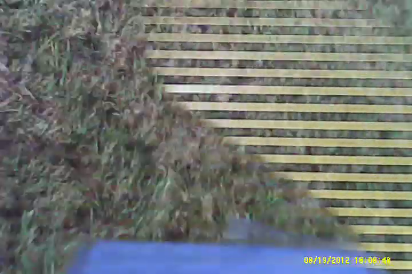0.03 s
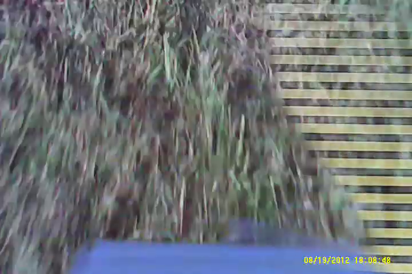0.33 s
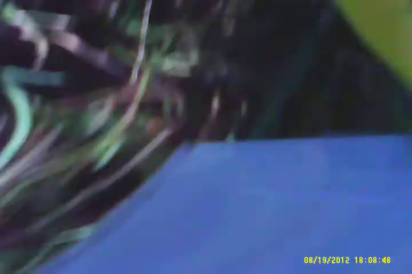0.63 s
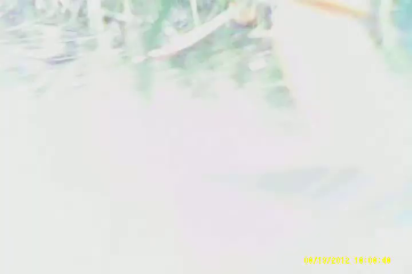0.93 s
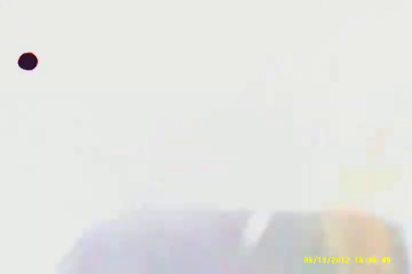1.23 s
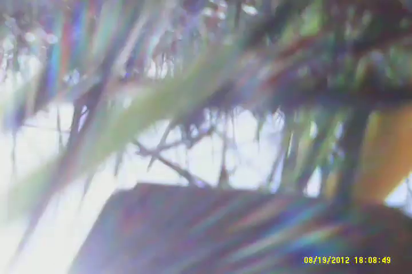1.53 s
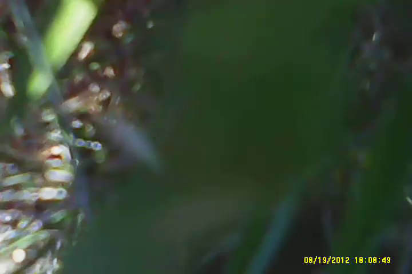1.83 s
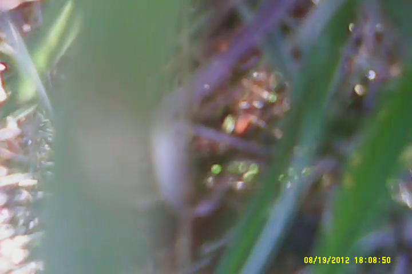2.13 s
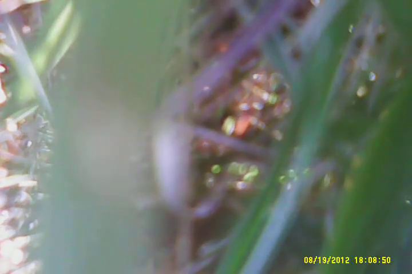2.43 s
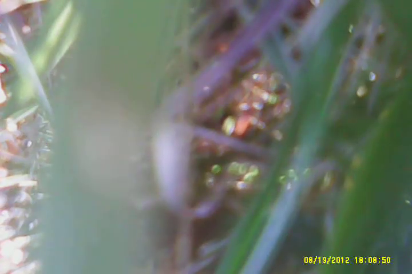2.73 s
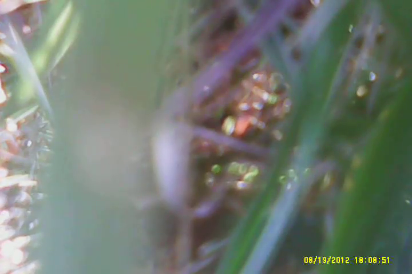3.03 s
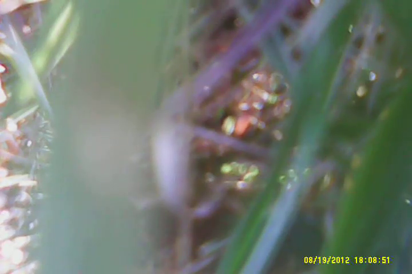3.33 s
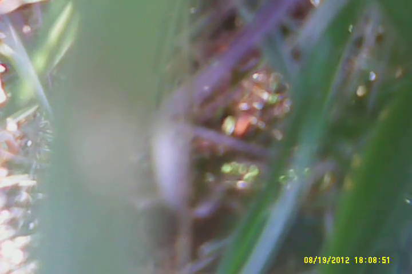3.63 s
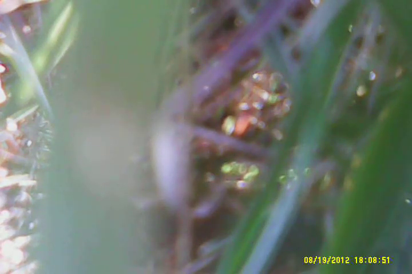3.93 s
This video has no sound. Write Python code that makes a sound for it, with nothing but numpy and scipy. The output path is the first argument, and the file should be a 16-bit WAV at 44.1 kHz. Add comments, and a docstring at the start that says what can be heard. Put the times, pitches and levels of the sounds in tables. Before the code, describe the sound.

A model plane crashes into reeds, heard from an overloaded microphone on board. Loud propeller buzz and wind cut off into harsh crackling, scraping, bumps and snaps, which thin to sparse ticks above soft hiss and electrical pulsing.

```python
"""A model plane flies low, its propeller and the wind overloading the microphone of its tiny camera.
It ploughs into tall reeds: the motor stops, leaves crackle, stems scrape, the airframe bumps, stalks snap.
Then it lies still and a few stalks tick as they settle.
The camera's hiss and soft electrical pulsing run underneath."""
import sys
import numpy as np
from scipy import signal
from scipy.fft import rfft, irfft, next_fast_len
from scipy.io import wavfile
from scipy.ndimage import uniform_filter1d

SR = 44100
rng = np.random.default_rng(int(sys.argv[2]) if len(sys.argv) > 2 else 0)


def bounce(signal):
    """Save signal as a 16-bit WAV file at the path given by the first command-line argument."""
    frames = np.transpose(np.atleast_2d(signal))
    limited = np.clip(frames, -1, 1)
    pcm = np.round(limited * 32767).astype(np.int16)
    wavfile.write(sys.argv[1], SR, pcm)


N = 176400
TIME_S = np.arange(N) / SR


def from_db(db):
    """Decibels to gain."""
    return 10 ** (np.asarray(db) / 20)


def unit_rms(x):
    """Scale to unit rms."""
    return x / np.sqrt(np.mean(x ** 2) + 1e-20)


def gain_curve(rows):
    """Gain along a level curve, silent outside it."""
    return from_db(np.interp(TIME_S, *np.transpose(rows), left=-150, right=-150))


def butter(x, hz, kind, order=2):
    """Butterworth filter."""
    return signal.sosfilt(signal.butter(order, hz, kind, fs=SR, output="sos"), x)


def cut_above(x, hz, taps):
    """Steep FIR low-pass."""
    return signal.fftconvolve(x, signal.firwin(taps, hz, fs=SR, window="blackman")[None], "same")


def drift(rate_hz):
    """Straight lines between unit-variance random knots."""
    knots = rng.standard_normal(4000)
    return np.interp(TIME_S * rate_hz, np.arange(len(knots)), knots)


def coloured(x, spectrum, centre_hz=None, half_width_oct=0.81):
    """Minimum-phase filter with the given spectrum, optionally peaked at a centre."""
    size = next_fast_len(2 * len(x)) // 2 * 2
    octave = np.log2(np.maximum(np.arange(size // 2 + 1) * SR / size, 1))
    hz, db = np.transpose(spectrum)
    log_gain = np.log(from_db(np.interp(octave, np.log2(hz), db)))
    if centre_hz:
        log_gain -= np.log(1 + ((octave - np.log2(centre_hz)) / half_width_oct) ** 2)
    cepstrum = irfft(log_gain)[:size // 2]
    cepstrum[0] /= 2
    response = np.exp(2 * rfft(cepstrum, size))
    return irfft(rfft(x, size) * response)[:len(x)]


def add(out, start_s, sound):
    """Mix a sound in at a time."""
    start = int(start_s * SR)
    out[start:start + len(sound)] += sound[:max(N - start, 0)]


def fractures(rate_hz=1800, spread_db=3, clump_db=4, clump_hz=110):
    """Tiny fractures of uneven size, in clumps, at an even slow level."""
    sizes_db = spread_db * np.minimum(rng.exponential(1, N), 4) + clump_db * drift(clump_hz)
    clicks = from_db(sizes_db) * rng.choice([-1, 1], N) * (rng.random(N) < rate_hz / SR)
    return clicks / np.sqrt(uniform_filter1d(clicks ** 2, size=1500) + 1e-6)


def burst(level_db, decay_s, spectrum, centre_hz=None, rise_s=.0001, crack_ratio=0, samples=4096):
    """A dying run of fractures, led by a crack of crack_ratio times the run's strength."""
    t = TIME_S[:samples]
    envelope = np.exp(-t / decay_s) * (1 - np.exp(-t / rise_s))
    cracks = envelope * rng.choice([-1, 1], samples) * from_db(3 * rng.standard_normal(samples))
    cracks[0] = crack_ratio * np.sqrt(np.sum(cracks ** 2))
    rms = from_db(level_db) * np.sqrt(np.mean(envelope ** 2))
    return rms * unit_rms(coloured(cracks, spectrum, centre_hz))


# freq_hz, density_db
HISS_SPECTRUM = [(30, 3), (150, -11), (400, -12), (800, -20.5), (2000, -23.5), (4600, -27.5), (6000, -28.5)]

def camera_hiss(level_db=-49):
    """Steady noise floor of the camera."""
    return from_db(level_db) * unit_rms(coloured(rng.standard_normal(N), HISS_SPECTRUM))


# start_s, depth_db
CURRENT_SURGES = [(1.93, -28), (2.125, -32), (2.271, -28), (2.416, -29.5), (2.608, -29.5), (2.752, -28),
                  (2.945, -30.5), (3.089, -30), (3.288, -29), (3.429, -30.5), (3.574, -30), (3.767, -29),
                  (3.911, -30.5)]

def camera_pulsing(period_s=.0483, align_s=2.74, pulse_s=.0099, pulse_db=-37, surge_s=.013, top_hz=330):
    """Bursts of current pull the signal down: regular pulses and rougher, deeper surges."""
    dips = from_db(pulse_db) * ((TIME_S - align_s) % period_s < pulse_s)
    roughness = 1 + 0.14 * unit_rms(butter(rng.standard_normal(N), top_hz, "low"))
    for start_s, depth_db in CURRENT_SURGES:
        dips += from_db(depth_db) * roughness * ((TIME_S > start_s) & (TIME_S < start_s + surge_s))
    rounded = butter(-dips, top_hz, "low", order=1)
    return butter(rounded, hz=14, kind="high", order=1)   # AC coupling


# freq_hz, density_db
REED_SPECTRUM = [(100, -15), (600, -9), (1200, -16.5), (1600, -8.5), (1900, -1.5), (2500, -2.5), (2850, -6),
                 (3150, -11), (3600, -4), (4100, -7.5), (4500, -5), (5000, -12.5), (5600, -14)]
# start_s, level_db, decay_s, centre_hz
STALK_SNAPS = [(.74, -2, 0.012, 2400), (0.787, -3.5, 0.0022, 3000), (0.94, -4, 0.0032, 2090),
               (.966, -4, 0.011, 2270), (1.086, -9, 0.0029, 2380), (1.255, -2.5, 0.008, 2320),
               (1.298, 3, 0.0025, 2870), (1.338, -8.5, .004, 2570), (1.346, -7, 0.0024, 2400),
               (1.409, -4, 0.0015, 2050), (1.438, -3.5, 0.0032, 2360), (1.462, -4.5, 0.0027, 2090),
               (1.493, -7, 0.0019, 2400), (1.508, -10, .003, 2260), (1.571, -16, 0.0077, 2410),
               (1.609, 2, 0.001, 3430), (1.626, -6, 0.0057, 2640), (1.662, -2.5, 0.0014, 2520),
               (1.678, -25, .002, 2500), (1.73, -8, 0.005, 2030), (1.763, -16, 0.0057, 4200),
               (1.774, -6, 0.0047, 4600), (1.781, -4, 0.0036, 2970), (1.823, -18.5, 0.0045, 4000),
               (1.865, -17, .004, 3000), (1.887, -18, 0.0024, 2500), (1.912, -21.5, 0.0062, 3500),
               (2.009, -29, 0.0045, 3000), (2.015, -2, 0.00095, 2500), (2.071, -22.5, 0.0023, 3000),
               (2.136, -21.5, 0.0053, 3070), (2.187, -33, .004, 4030), (2.199, -24, 0.0019, 2800),
               (2.211, -28.5, 0.0026, 2330), (2.251, -24, 0.002, 2490), (2.263, -29, 0.0015, 4000),
               (2.293, -29.5, 0.0031, 3300), (2.3694, -20.5, 0.01, 2600), (2.379, -19, 0.0041, 3500),
               (2.397, -30, 0.0039, 3000), (2.416, -41, .003, 3700), (2.46, -41.5, 0.0049, 2600),
               (2.615, -44.5, .004, 1900), (2.643, -41.5, 0.0042, 1900), (2.74, -44, .003, 4000),
               (2.7895, -36, 0.0012, 4120), (2.819, -46, .003, 2600), (2.897, -47, .002, 4300),
               (3.173, -29.5, 0.0014, 3390), (3.453, -39.5, .003, 2400), (3.4789, -20, 0.0011, 2400),
               (3.4963, -25.5, 0.0022, 4030), (3.681, -35, 0.0019, 2100), (3.987, -45.5, 0.0033, 2000)]

def stalk_snaps():
    """Stalks snap under the plane, then tick as they settle."""
    out = np.zeros(N)
    for start_s, level_db, decay_s, centre_hz in STALK_SNAPS:
        add(out, start_s, burst(level_db, decay_s, REED_SPECTRUM, centre_hz, crack_ratio=0.58))
    return out


# time_s, level_db
CRACKLE_LEVELS = [(.59, 14), (.612, 23.5), (.648, 5), (.675, -5), (.715, -2.5), (.76, -11.5), (.815, -16),
                  (.85, -4.5), (.895, 0.5), (.93, -7), (.96, -12), (1.01, -13.5), (1.055, -21.5),
                  (1.087, -14), (1.12, -35.5), (1.16, -35), (1.2, 5), (1.245, -12.5), (1.295, -11.5),
                  (1.34, -19), (1.37, -32), (1.42, -18.5), (1.46, -14), (1.535, -23), (1.61, -15.5),
                  (1.7, -17.5), (1.79, -20.5), (1.85, -29.5), (1.92, -29.5), (1.995, -43.5), (2.03, -29),
                  (2.07, -31), (2.1, -46), (2.22, -47.5), (2.32, -67)]

def leaf_crackle():
    """Leaves and stalks crackle along the airframe."""
    return gain_curve(CRACKLE_LEVELS) * unit_rms(coloured(fractures(), REED_SPECTRUM))


# freq_hz, density_db
AIRFRAME_SPECTRUM = [(40, -13), (150, -2), (350, 0.5), (650, -0.5), (1000, -3.5), (1400, -1.5), (2000, 2),
                     (3200, -11.5), (5000, -38)]
# time_s, level_db
SCRAPE_LEVELS = [(.59, 9), (.61, 17.5), (.66, -8), (.7, -9), (.78, -14), (.825, -12), (.86, -5),
                 (.92, -12.5), (1.03, -22.5), (1.055, -16), (1.09, -23), (1.14, -24.5), (1.16, -17.5),
                 (1.2, -3.5), (1.25, -13.5), (1.3, -13.5), (1.38, -29), (1.47, -36), (1.54, -25.5),
                 (1.7, -41.5), (1.88, -29), (2, -51.5), (2.06, -32.5), (2.2, -73)]

def airframe_scrape():
    """The airframe scrapes through the stems."""
    return gain_curve(SCRAPE_LEVELS) * unit_rms(coloured(fractures(), AIRFRAME_SPECTRUM))


# freq_hz, density_db
BUMP_SPECTRUM = [(25, -1.5), (70, 1), (160, -4.5), (300, -9), (800, -26.5), (3000, -50)]
# start_s, level_db, decay_s
DULL_BUMPS = [(0.609, -1, 0.048), (.68, -4, 0.037), (0.844, 1, 0.02), (1.181, 2.5, .025), (1.285, -17, .04),
              (1.332, -11.5, 0.014)]
# start_s, level_db, decay_s, centre_hz
HARD_KNOCKS = [(1.153, -4.5, 0.003, 1190), (1.168, -13.5, 0.01, 1090), (1.474, -12.5, 0.002, 700),
               (1.572, -13.5, 0.0025, 650), (1.822, -4, .0035, 592), (2.132, -31, 0.0082, 496),
               (2.3683, -23.5, 0.011, 710)]

def airframe_impacts():
    """The airframe shudders with dull bumps and takes short hard knocks."""
    out = np.zeros(N)
    for start_s, level_db, decay_s in DULL_BUMPS:
        add(out, start_s, burst(level_db, decay_s, BUMP_SPECTRUM, rise_s=.0051, samples=16384))
    for start_s, level_db, decay_s, centre_hz in HARD_KNOCKS:
        add(out, start_s, burst(level_db, decay_s, AIRFRAME_SPECTRUM, centre_hz, crack_ratio=1.2))
    return out


# freq_hz, density_db
WIND_SPECTRUM = [(30, -16.5), (90, -6), (200, 0), (500, -3), (1000, -6), (2000, -10.5), (3200, -17),
                 (5000, -25)]

def wind(level_db=14, gust_db=1.5):
    """Airflow buffets the microphone."""
    rush = unit_rms(coloured(rng.standard_normal(N), WIND_SPECTRUM))
    return rush * from_db(level_db + gust_db * drift(rate_hz=60))


# harmonic, relative_db
PROPELLER_HARMONICS = [(1, 0), (2, -2.5), (3, -5), (4, -4.5), (5, -9), (6, -17), (7, -22), (8, -14)]

def propeller(pitch_hz=238.6, wobble=.002, level_db=14, flicker_db=0.74):
    """Propeller buzz: harmonics of a slightly wavering pitch."""
    phase = 2 * np.pi * np.cumsum(pitch_hz * (1 + wobble * drift(rate_hz=25))) / SR
    buzz = np.zeros(N)
    for harmonic, relative_db in PROPELLER_HARMONICS:
        gain = from_db(relative_db + flicker_db * drift(rate_hz=24))
        offset = np.pi * harmonic ** 2 / len(PROPELLER_HARMONICS)   # spreads energy over the cycle
        buzz += gain * np.sin(harmonic * phase + offset)
    return from_db(level_db) * unit_rms(buzz)


def scene(impact_s=.598, stop_decay_s=.013):
    """Mono mix at the on-board microphone; propeller and wind die away on impact."""
    flight_gain = np.exp(-np.maximum(TIME_S - impact_s, 0) / stop_decay_s)
    flight = (propeller() + wind()) * flight_gain
    crash = leaf_crackle() + airframe_scrape() + stalk_snaps() + airframe_impacts()
    camera = camera_pulsing() + camera_hiss()
    return (camera + crash + flight)[None]


def record(dry):
    """Camera audio path: input overload, band limit, output clip, top cut."""
    overloaded = np.clip(dry, -0.74, 0.74)
    narrow = cut_above(overloaded, hz=5480, taps=141)
    clipped = np.clip(narrow, -0.68, 0.68)
    return cut_above(clipped, hz=15800, taps=401)


dry = scene()
out = record(dry)
bounce(out)
```